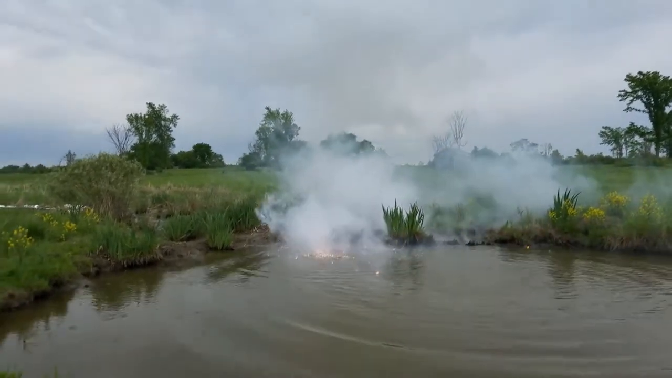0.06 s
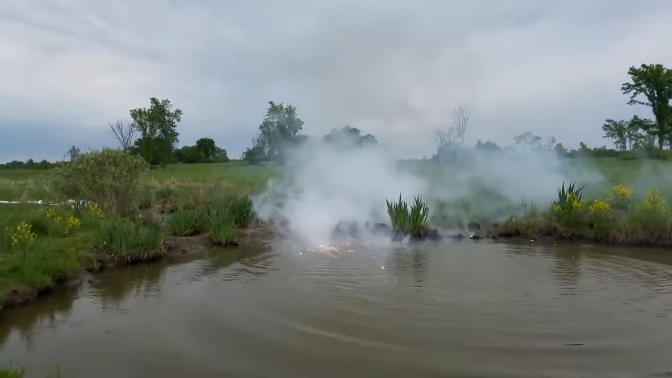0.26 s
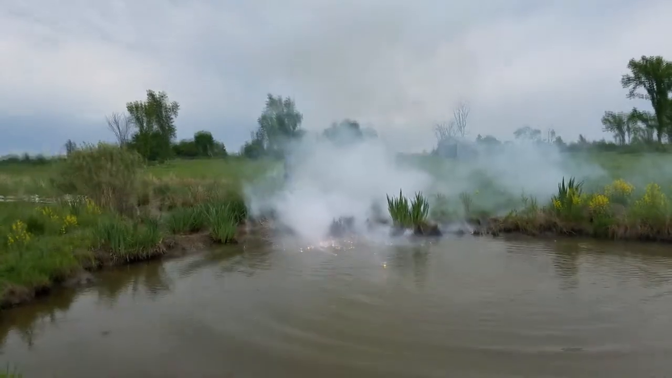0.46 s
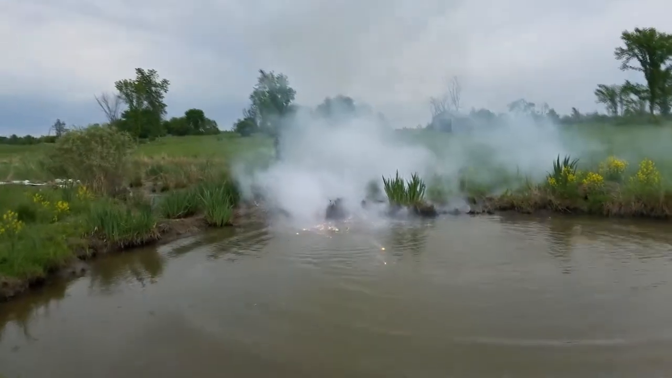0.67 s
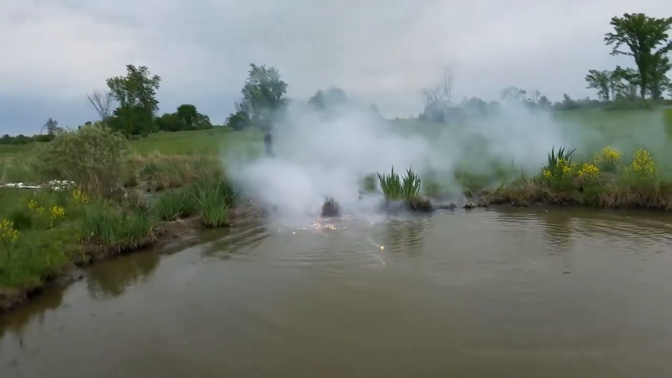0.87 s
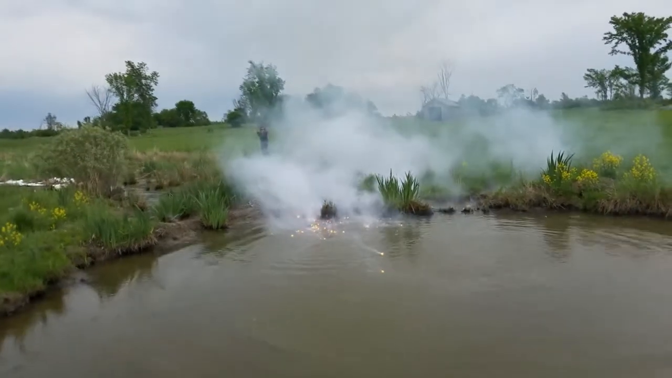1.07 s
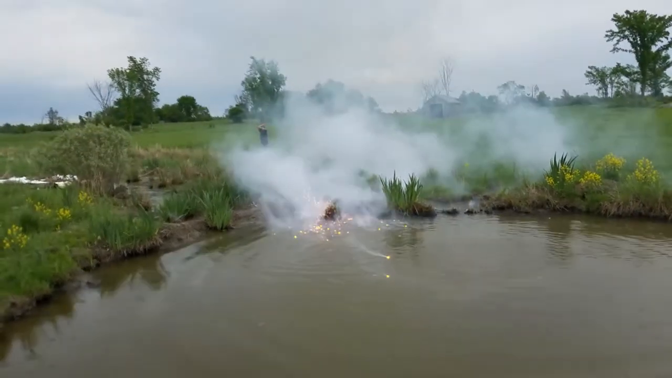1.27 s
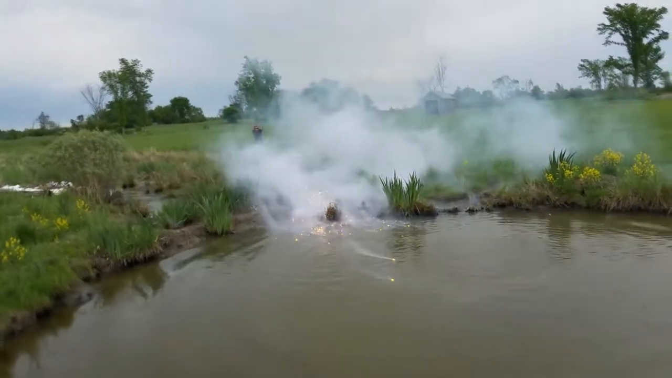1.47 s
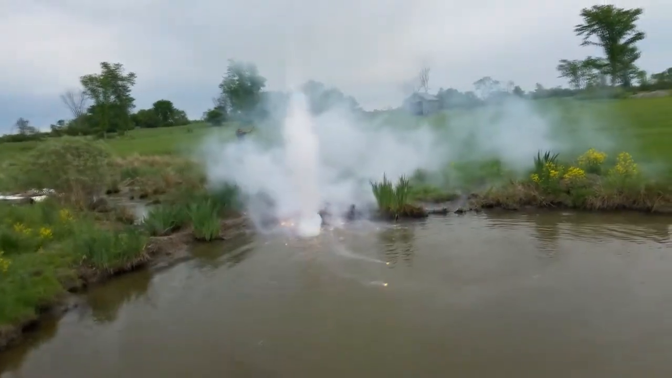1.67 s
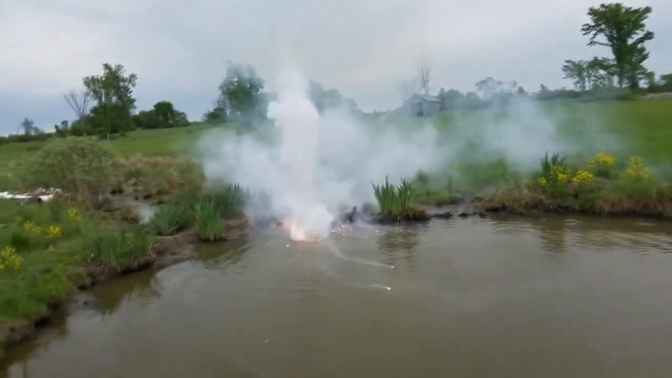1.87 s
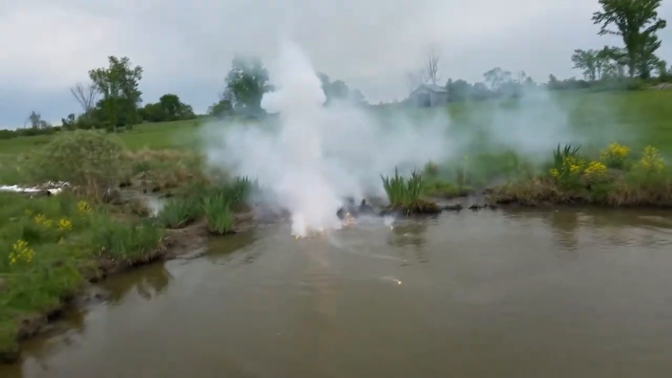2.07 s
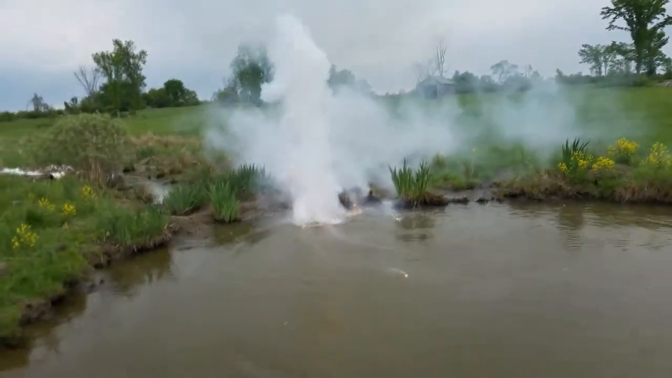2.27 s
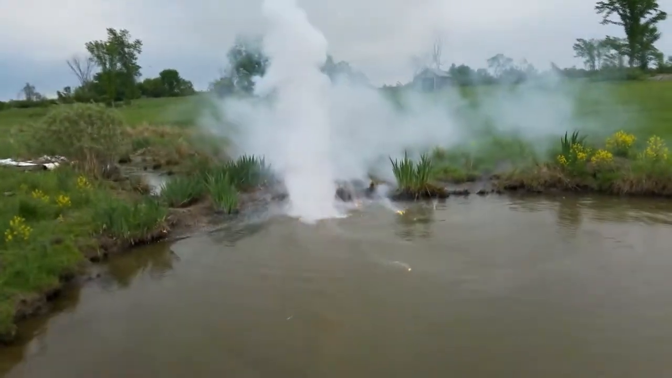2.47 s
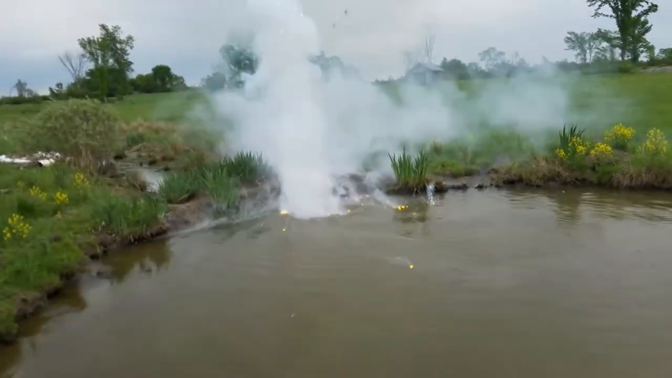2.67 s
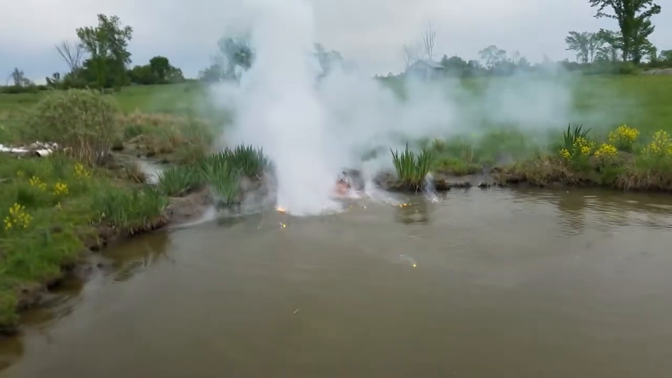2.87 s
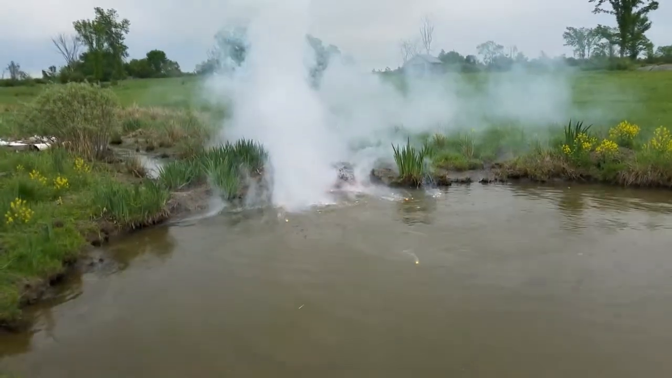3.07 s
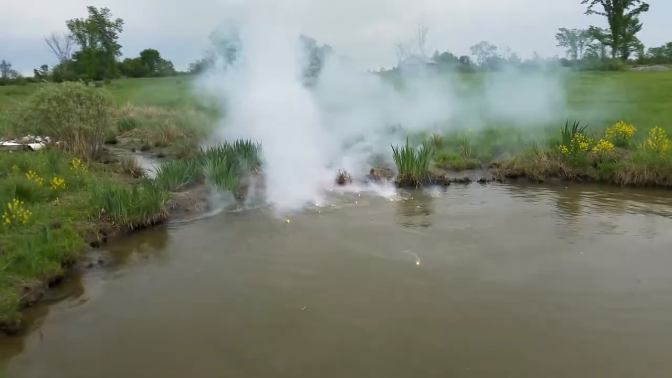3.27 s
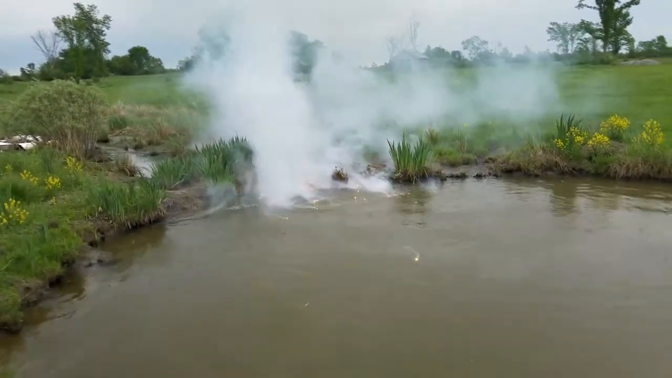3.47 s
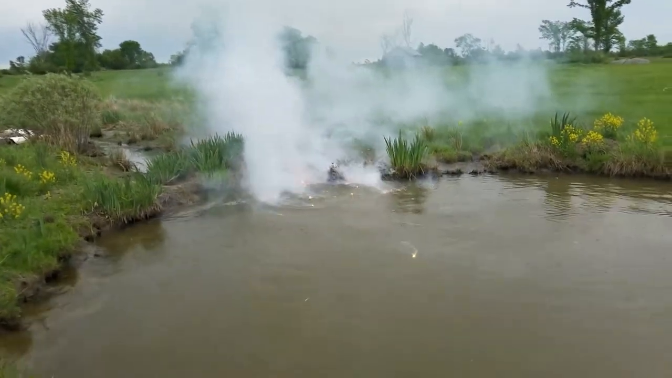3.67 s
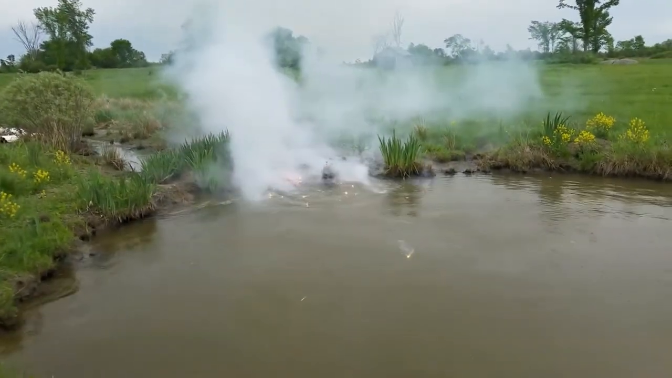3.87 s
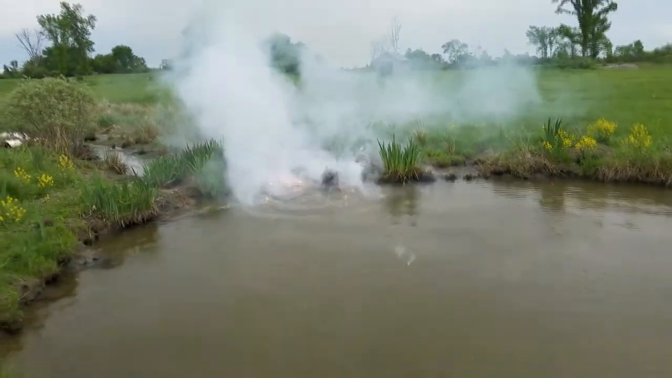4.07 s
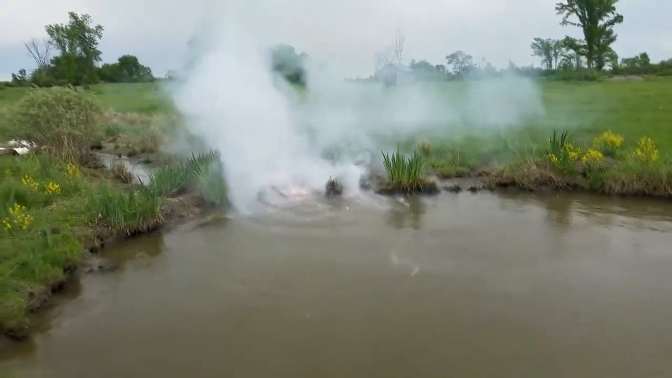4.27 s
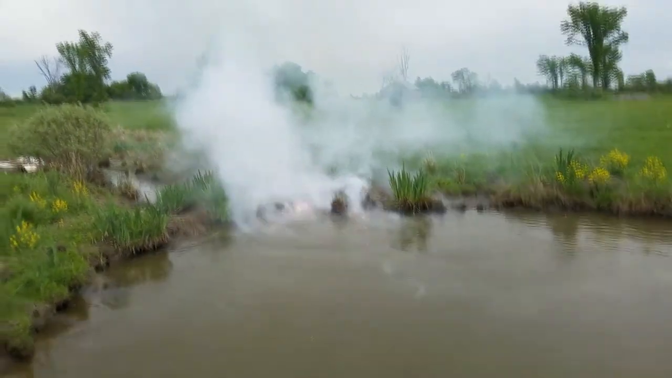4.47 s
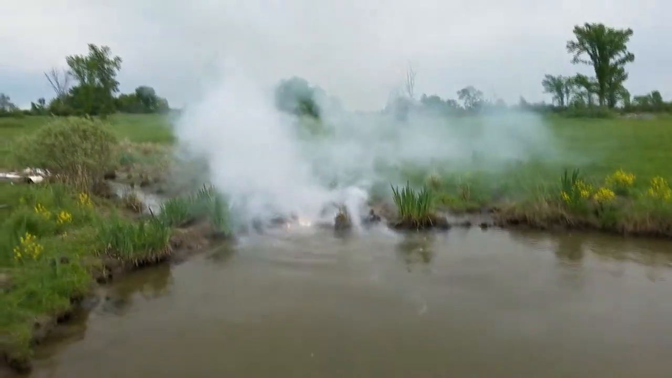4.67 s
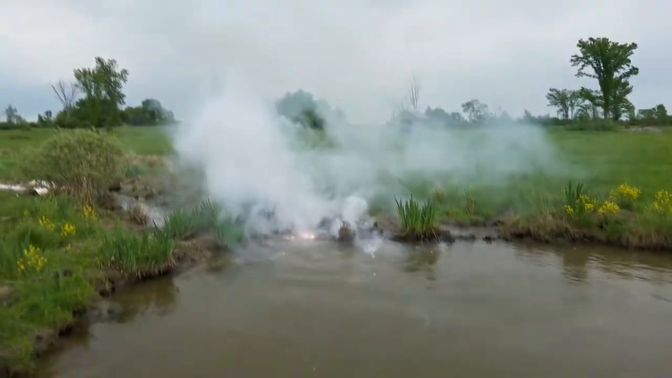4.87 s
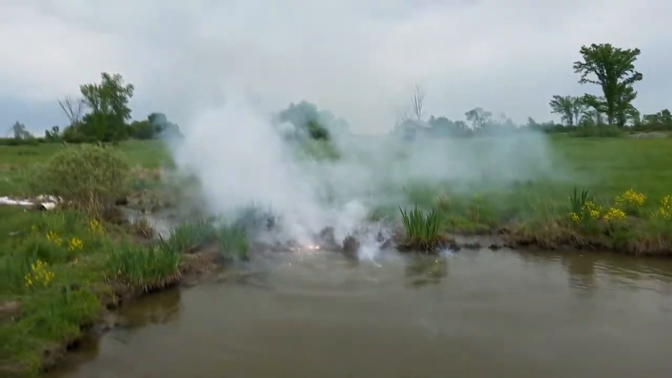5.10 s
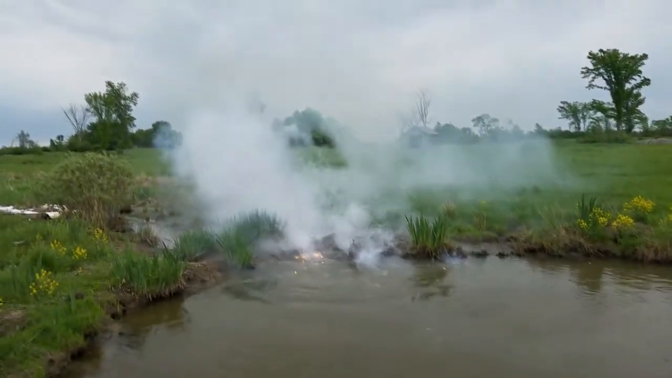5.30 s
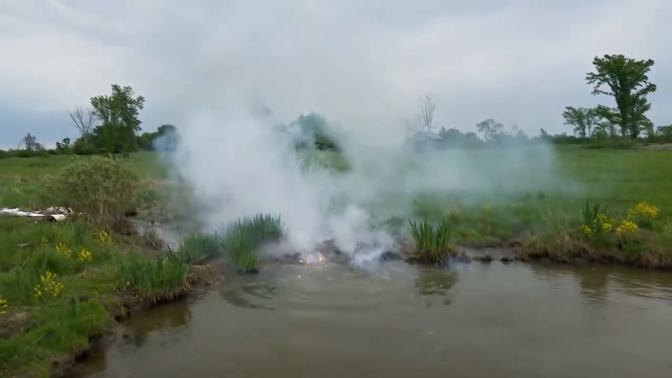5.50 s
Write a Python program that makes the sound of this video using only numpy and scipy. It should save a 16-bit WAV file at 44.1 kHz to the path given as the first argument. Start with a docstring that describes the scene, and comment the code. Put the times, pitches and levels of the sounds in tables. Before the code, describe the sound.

An open-air pond, heard in stereo from some metres away. From the start, bright gas hiss, dull boiling and dense tiny crackles flicker in spits, with irregular dry pops. The fizz strengthens toward 0.9 seconds over a faint low flame rumble, and a hard snap lands near 1.07. At about 1.57 a large pocket explodes: a volley of shocks within milliseconds, fused into one harsh, softly clipped bang with splashy spray and a brief scattered tail. The hiss then drops sharply, leaving strong separate pops at 1.8, 1.95, a cluster at 2.25 to 2.4, and quieter ticks. From about 3.2 the fizzing and crackling climb again, densest near 3.6, then waver; a loud pop cracks at 4.1. After a thinner stretch there is another surge around 5.0, a very sharp double pop at 5.2, and a quick fall to near quiet by 5.5.

```python
"""Sodium fizzing and popping on a pond

Chunks of sodium skate on an outdoor pond, fizzing and burning, some metres from a hand-held camera.
Hydrogen bubbles ignite as crackles and sharp pops: minimum-phase shocks trailed by noise for spray and banks.
A large pocket goes off as a quick volley of shocks that overloads the microphone.
Hiss, boiling and flame are coloured noise on one vigour curve, which drops after the bang and builds again."""
import sys
import numpy as np
from scipy import signal
from scipy.fft import rfft, irfft, next_fast_len
from scipy.io import wavfile
from scipy.ndimage import uniform_filter1d

SR = 44100
rng = np.random.default_rng(int(sys.argv[2]) if len(sys.argv) > 2 else 0)


def unload_audio(sound):
    """Save the sound as a 16-bit wav file, at the path given as the first command line argument."""
    columns = np.transpose(np.atleast_2d(sound))
    # keep every value between -1 and 1, then stretch to whole-number steps
    steps = np.round(np.clip(columns, -1, 1) * 32767)
    wavfile.write(sys.argv[1], SR, steps.astype(np.int16))


N = 244309
LEAD = 96  # samples kept ahead of each shock


def gain_of(db):
    """Decibels to amplitude."""
    return 10 ** (np.asarray(db) / 20)


def evened(x):
    """Scales to rms 1."""
    return x / np.sqrt(np.mean(x ** 2) + 1e-20)


def read(points, hz):
    """Interpolates a spectrum on a log-frequency axis."""
    f, value = np.transpose(points)
    return np.interp(np.log(hz + 1), np.log(f + 1), value)


def add(mix, start_s, sound):
    """Adds a stereo sound in place at start_s."""
    start = max(round(start_s * SR), 0)
    part = mix[:, start:][:, :sound.shape[1]]
    part += sound[:, :part.shape[1]]


def causal(gain):
    """The minimum-phase spectrum with this gain: sharp front, ringing after."""
    log_gain = np.log(np.maximum(gain, gain.max() * 1e-5))
    circle = np.concatenate([log_gain, log_gain[-2:0:-1]])
    return np.exp(np.conj(signal.hilbert(circle)))[:len(gain)]


def port_noise(size, colour):
    """Coloured noise at two microphone ports: alike in the low middle, unrelated in the treble."""
    # likeness of the ports: freq_hz, likeness (0-1)
    likeness = [(40, 0.1), (130, 0.7), (300, 0.75), (640, 0.99), (1400, 0.72), (3000, 0.11), (16000, 0.02)]
    hz = np.fft.rfftfreq(size, 1 / SR)
    a, b = rfft(rng.standard_normal((2, size)))
    same = np.clip(read(likeness, hz), 0, 1)
    mid = np.sqrt((1 + same) / 2) * a
    side = np.sqrt((1 - same) / 2) * b
    return irfft(np.array([mid + side, mid - side]) * gain_of(read(colour, hz)), size)


def shock(pitch_hz, edge_db, spray_db, size=8192, spray_s=0.0092, bank_s=0.028, bank_db=-10,
          field_s=0.037, field_db=-29, echo_s=0.0029, echo_db=-10, case_s=0.0013, case_db=-2.5,
          lag_s=0.00017, mono_hz=1750):
    """One hydrogen pop, LEAD samples in: pressure jump and undershoot, close echo, spray, banks."""
    # colour of a shock at the microphone: freq_hz, level_db
    shock_colour = [(20, 7.5), (60, -11.5), (130, -1), (220, -5.5), (450, 5), (640, -1.5), (800, 1.5),
                    (1300, 1), (2000, -1.5), (2600, 1.5), (3500, 6.5), (5000, 1.5), (7000, -11.5),
                    (13000, -13), (16000, -18.5)]
    # colour of spray and scatter relative to the shock: freq_hz, level_db
    spray_colour = [(30, 18.5), (200, -2), (500, 2.5), (1200, -5.5), (2500, -0.5), (5000, -11),
                    (8000, -5.5), (16000, -1)]
    # colour of the answer from the banks: freq_hz, level_db
    bank_colour = [(40, -1), (150, -12.5), (420, 0.5), (750, -1.5), (1200, -8), (2500, -2.5), (5000, -11),
                   (16000, -2.5)]
    t, hz = np.arange(size) / SR, np.fft.rfftfreq(size, 1 / SR)

    def dying(decay_s, delay_s):
        """Envelope of unit energy that swells, then dies."""
        shape = np.exp(-t / decay_s) * (1 - np.exp(-(t / delay_s) ** 2))
        return shape / np.linalg.norm(shape)

    u = np.hypot(hz, 12) / pitch_hz
    treble_db = edge_db * np.clip((hz - 5000) / 2500, 0, 1)
    gain = u / (1 + u ** 2) * gain_of(read(shock_colour, hz) + treble_db)
    # no two bubbles have the same shape, so each stresses other pitches
    gain = gain * gain_of(2 * np.sin(4 * np.log2(hz + 200) + 2 * np.pi * rng.random()))
    pulse = causal(evened(gain))

    # spray follows at once, in spurts about a millisecond long
    spurt_db = 3 * evened(uniform_filter1d(rng.standard_normal(size), size=50))
    spurts = evened(gain_of(spurt_db))
    spray = port_noise(size, spray_colour) * dying(spray_s, 0.0017) * spurts * gain_of(spray_db)

    # grassy banks and the far field answer later
    banks = gain_of(spray_db + bank_db) * dying(bank_s, 0.013)
    field = gain_of(field_db) * dying(field_s, 0.021)
    scatter = rfft(spray + port_noise(size, bank_colour) * np.hypot(banks, field))

    # short waves bend round the camera case differently for each port, and reach the right one first
    apart = hz ** 4 / (hz ** 4 + mono_hz ** 4)
    case = rfft(rng.standard_normal((2, size)) * dying(case_s, 0.000067))
    case = case * gain_of(case_db) * hz / np.hypot(hz, 1000)
    direct = np.exp(-2j * np.pi * hz * apart * np.array([[lag_s], [0]])) + case

    echo = gain_of(echo_db) * np.exp(-2j * np.pi * hz * echo_s * rng.uniform(0.8, 1.2))
    heard = irfft(pulse * (direct * (1 + echo) + scatter), size)
    fade_out = np.minimum(1, (t[-1] - t) * 50)
    return np.roll(heard, LEAD, axis=1) * fade_out


def ringing(x, modes, level_db):
    """What damped modes give back when x strikes them."""
    size = next_fast_len(N + SR // 2)
    hz = np.fft.rfftfreq(size, 1 / SR) + 1e-6
    response = sum(gain_of(db) / (1 + 1j * (hz / f - f / hz) * f / width_hz) for f, width_hz, db in modes)
    return gain_of(level_db) * irfft(rfft(x, size) * response, size)[:, :N]


def crackle(strength, per_s, level_db, spread_db, low_hz, high_hz, edge_db, count=14):
    """Small bubbles ignite at random; a calmer reaction gives fewer of them as well as smaller ones."""
    out, vigour = np.zeros((2, N)), evened(strength) ** 0.75
    for pitch_hz in np.geomspace(low_hz, high_hz, count):
        fires = rng.random(N) < vigour * per_s / count / SR
        sizes = gain_of(level_db + spread_db * np.minimum(rng.exponential(1, N), 2.6))
        tick = shock(pitch_hz, edge_db + rng.uniform(-6, 6), -11, size=3072)
        tick = tick * gain_of(rng.normal(0, 2, (2, 1)))  # each pitch sits off centre
        hits = fires * sizes * strength / np.sqrt(vigour)
        out += signal.oaconvolve(hits[None], tick, axes=1)[:, :N]
    return out


def seethe(strength, colour, level_db, flicker_db, flicker_hz):
    """A rush of gas, as coloured noise whose level flickers as the metal skips on the water."""
    slow = rfft(rng.standard_normal(N)) / (1 + (np.fft.rfftfreq(N, 1 / SR) / flicker_hz) ** 2)
    flicker = gain_of(flicker_db * evened(irfft(slow, N)))
    rush = port_noise(next_fast_len(N), colour)[:, :N] * flicker
    return gain_of(level_db) * strength * evened(rush)


def pops():
    """Bubbles that stand out of the crackle: one shock each, with its own level and pitch."""
    # pops: start_s, relative level_db, pitch_hz, treble edge_db, spray_db after the shock
    rows = [(0.0224, -7, 6750, -16, -6), (0.0893, -8.5, 5000, -4, -8), (0.1418, -8.5, 1900, 14, -10),
            (0.1912, -8.5, 1080, 3, 4.5), (0.2367, -10.5, 1900, 5, 8.5), (0.2721, -10, 3400, 8, 4),
            (0.2938, -9, 1760, 6, 2.5), (0.4805, 1, 910, -21, -12), (0.5022, -5.5, 2030, 7.5, 0),
            (0.5618, -1, 7140, -4.5, -18), (0.6169, -2, 1120, -39, -10), (0.6441, -2.5, 1010, 6, -4.5),
            (0.7187, -6.5, 2200, -7, -3), (0.8429, -3.5, 1670, 6.5, -10), (0.8495, -10, 1400, 12, -15),
            (1.0706, 6.5, 3140, -4, -14), (1.0854, 1.5, 550, -21, -8), (1.105, -7, 2490, 1, 6),
            (1.1287, -4.5, 1300, 7, -1), (1.1685, -9, 1190, 7, -2.5), (1.2207, -11.5, 1050, -15, -11),
            (1.2455, 2.5, 800, 0, -8), (1.355, -5, 1510, -20, -20), (1.3676, -7, 1300, 13, -7),
            (1.4154, 2, 2410, 3.5, -4), (1.513, -11, 610, 11, -10), (1.5328, -0.5, 7000, -7, -5),
            (1.6846, -15.5, 940, -10, -1.5), (1.8211, 8, 813, 2.5, 4), (1.8596, 1.5, 950, -4, -8),
            (1.9558, 8.5, 850, -12, -7), (2.0226, -17.5, 1700, 10, -18), (2.0327, -20.5, 770, -21, 3),
            (2.1394, -10.5, 1100, 10.5, -8), (2.1838, -22, 1800, 8, -19), (2.2489, 0.5, 1240, 1, 0),
            (2.2609, 2.5, 1200, 5.5, -0.5), (2.2718, -13, 820, -17, -5), (2.2784, 0.5, 950, 0, -3),
            (2.3214, 6, 835, 0, 1.5), (2.3323, -3, 770, 2, -21), (2.3932, 10, 1020, -1, -2.5),
            (2.5231, -14, 2070, -1, -4), (2.5914, -21.5, 1250, -5, -14), (2.6389, -14.5, 600, -12, 1),
            (2.6463, -1.5, 1470, -1.5, -6), (2.7702, -15, 1000, -15, -2), (2.8361, -14, 1300, -10, -29),
            (2.8596, -10.5, 362, 5, -11.5), (2.9897, -17.5, 1900, 7, -17), (3.196, -13.5, 1800, 7, 2),
            (3.2298, -2, 1140, 1, -7.5), (3.317, -3.5, 920, 5, -8), (3.3376, -3.5, 2220, 3, -10),
            (3.3771, -7.5, 1510, 0, -19), (3.4255, 1.5, 1950, 7, -3.5), (3.6071, -4, 2280, 12, -6),
            (3.6241, -4.5, 700, -24, -15), (3.6444, 4.5, 1190, 2.5, -7.5), (3.6853, -1.5, 1740, 7, -23),
            (3.7466, -3, 4670, -9, -17), (3.7977, -9.5, 1140, 0, -26), (3.8511, -12.5, 1720, 5, -12),
            (3.8804, -11.5, 2720, 10.5, -15), (3.9088, -6, 1190, -1, -6), (3.9579, -11, 600, -6, -25),
            (3.9913, -9.5, 1210, 11.5, -24), (4.0831, 8, 1180, -2, -4), (4.1619, -11, 1610, 12, -1),
            (4.181, -12, 2620, -18, -16), (4.2444, -18, 1090, 9, 4.5), (4.352, -17.5, 1600, -3, 0),
            (4.4527, -19, 604, 8, -18), (4.5106, -8.5, 3900, -6, -27), (4.5698, -10, 2080, 6, 7),
            (4.7584, -12, 7000, 10.5, -21), (4.7911, 0, 4200, -3, -20), (4.8765, -1.5, 1200, 9.5, -2),
            (4.931, -11.5, 930, 17, -3), (4.9667, -12, 1000, 11, -26), (5.0747, -3, 1620, 9.5, 2.5),
            (5.1347, -15.5, 1000, 9, 10.5), (5.1428, -7, 2520, 7, -1), (5.1957, 10, 1150, 13, -6),
            (5.1984, 10, 1470, -36, 2)]
    # faint low ring that hangs on: freq_hz, width_hz, relative level_db
    ring = [(188.4, 6, -3), (376.8, 6.5, -17)]
    ring_from_s = 4  # earlier pops leave no ring
    # left-right dB per octave above the centred pitch: higher pops favour the right port
    pan_db_per_octave, centre_hz = -0.17, 680
    out = np.zeros((2, N))
    for start_s, db, pitch_hz, edge_db, spray_db in rows:
        pan_db = pan_db_per_octave * np.log2(pitch_hz / centre_hz)
        sides = gain_of(np.array([[pan_db], [-pan_db]]) / 2)
        pop = shock(pitch_hz, edge_db, spray_db)
        add(out, start_s - LEAD / SR, gain_of(db - 2.6) * sides * pop)
    strikes = out * (np.arange(N) > ring_from_s * SR)
    return out + ringing(strikes, ring, level_db=11)


def bang():
    """A large pocket goes off in several shocks, with long spray and field tails and a short resonant colour."""
    # volley of shocks: start_s, relative level_db, pitch_hz
    volley = [(1.5688, 15, 990), (1.5717, 21, 1160), (1.5735, 8, 692), (1.5784, 13, 700), (1.59, -9, 860)]
    # modes that colour the bang: freq_hz, width_hz, relative level_db
    bang_modes = [(265, 90, 2), (520, 80, -3), (780, 150, 1), (1240, 120, 3), (1490, 110, -1),
                  (2640, 160, -4)]
    out = np.zeros((2, N))
    for start_s, db, pitch_hz in volley:
        blast = shock(pitch_hz, edge_db=6.0, spray_db=-4.0, size=16384, spray_s=0.019,
                      bank_s=0.022, bank_db=-9, field_s=0.066, field_db=-27.5)
        add(out, start_s - LEAD / SR, gain_of(db - 5) * blast)
    return out + ringing(out, bang_modes, level_db=3.5)


def stray_pops(hiss):
    """Now and then a middling bubble ignites between the loud pops."""
    snaps = crackle(hiss, per_s=26, level_db=23, spread_db=3.5, low_hz=800, high_hz=4500, edge_db=6, count=8)
    return snaps * gain_of([[-2.2], [1.8]])


def fizz_gains():
    """Amplitude curves of hiss, boiling and flame, driven by the vigour of the reaction, plus low swells."""
    # vigour of the reaction: time_s, relative hiss level_db
    vigour = [(0, -50.5), (0.3, -48), (0.9, -44), (1.539, -46.5), (1.679, -61.5), (2.201, -59),
              (2.499, -61), (2.701, -61), (3.17, -56), (3.38, -48), (3.619, -44.5), (3.83, -53),
              (4.04, -48), (4.28, -59.5), (4.381, -53.5), (4.62, -54), (5.04, -46), (5.15, -47.5),
              (5.29, -62.5), (5.53, -64.5)]
    # low swells: flares of the flame, and the low tail of the last pops:
    # peak_s, half_width_s (to 1/e), relative level_db
    low_swells = [(0.21, 0.064, -60), (0.97, 0.33, -53), (3.61, 0.046, -66), (5.05, 0.059, -51.5),
                  (5.241, 0.088, -66)]
    full_db = -45  # hiss level at which boil_db and flame_db hold
    boil_db, boil_slope = -48, 0.88  # slope: dB per dB of hiss
    flame_db, flame_slope, ember_db = -63, 1.3, -81  # embers: floor of the flame
    spit_db, spit_max_hz = 1.5, 16  # the chunks skip, so the fizz comes in spits
    t = np.arange(N) / SR
    slow = rfft(rng.standard_normal(N)) * (np.fft.rfftfreq(N, 1 / SR) < spit_max_hz)
    spits = evened(irfft(slow, N))
    hiss_db = np.interp(t, *np.transpose(vigour)) + spit_db * spits
    above_full_db = hiss_db - full_db
    boil = gain_of(boil_db + boil_slope * above_full_db)
    burning = np.hypot(gain_of(flame_db + flame_slope * above_full_db), gain_of(ember_db))
    swelling = sum(gain_of(db) * np.exp(-((t - peak_s) / width_s) ** 2) for peak_s, width_s, db in low_swells)
    return gain_of(hiss_db), boil, np.hypot(burning, swelling)


def escaping_gas(hiss):
    """Hydrogen and steam hiss from the metal, dotted with bright sparks."""
    # hiss spectrum: freq_hz, relative density_db (per Hz)
    hiss_colour = [(500, -26.5), (2000, -20.5), (3200, 3), (4000, 4), (5300, -5), (6500, -4.5),
                   (9000, -8.5), (12500, -5.5), (16000, -9.5)]
    sparks = crackle(hiss, per_s=260, level_db=12.5, spread_db=5.0, low_hz=1800, high_hz=8000, edge_db=4)
    rush = seethe(hiss, hiss_colour, level_db=-4.2, flicker_db=1.9, flicker_hz=120)
    return (rush + sparks) * gain_of([[-1.7], [1.3]])


def boiling_water(boil):
    """Water boils round the chunks, with duller snaps."""
    # boiling spectrum: freq_hz, relative density_db (per Hz)
    boil_colour = [(80, -5), (220, -15), (400, 3.5), (600, 1), (1300, -1.5), (2200, 0), (3200, -3.5),
                   (6000, -20)]
    snaps = crackle(boil, per_s=150, level_db=13.5, spread_db=4.3, low_hz=650, high_hz=2200, edge_db=-2)
    return seethe(boil, boil_colour, level_db=-4, flicker_db=2, flicker_hz=120) + snaps


def burning_flame(flame):
    """The flame rumbles as low, slowly flickering noise."""
    # flame spectrum: freq_hz, relative density_db (per Hz)
    flame_colour = [(15, -11), (40, 0.5), (100, 7.5), (160, 5), (260, 3.5), (600, -35.5)]
    return seethe(flame, flame_colour, level_db=-1, flicker_db=2, flicker_hz=12)


def scene():
    """Pops and bang over hiss, boiling and flame."""
    hiss, boil, flame = fizz_gains()
    blasts = pops() + bang() + stray_pops(hiss)
    return blasts + escaping_gas(hiss) + boiling_water(boil) + burning_flame(flame)


def record(dry):
    """The ports differ in colour, the microphone overloads softly on the loudest shocks, then a band limit."""
    # colour difference of the ports: freq_hz, left-right level_db
    tilt = [(200, 0.5), (1000, -1.5), (2000, 5), (4000, -3), (8000, -7.5), (14000, -6.5)]
    overload, edge_hz = 0.68, 16300  # overload: amplitude ceiling
    size = next_fast_len(N + SR // 2)
    tilt_db = read(tilt, np.fft.rfftfreq(size, 1 / SR))
    port_gains = gain_of(np.array([tilt_db, -tilt_db]) / 2)
    heard = irfft(rfft(dry, size) * port_gains, size)[:, :N]
    clipped = heard / (1 + (heard / overload) ** 6) ** (1 / 6)
    low_pass = signal.firwin(255, edge_hz, window=("kaiser", 9), fs=SR)
    return signal.oaconvolve(clipped, low_pass[None], "same")


dry = scene()
out = record(dry)
unload_audio(out)
```